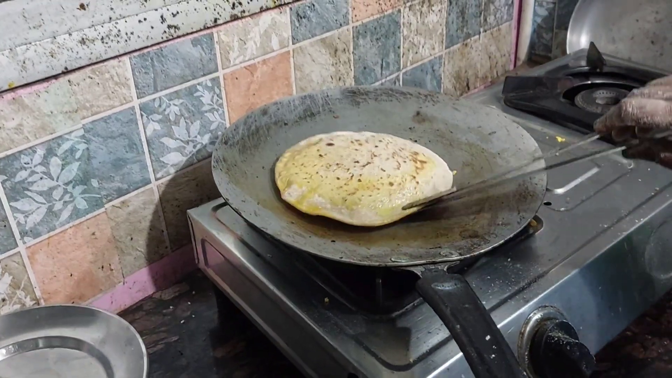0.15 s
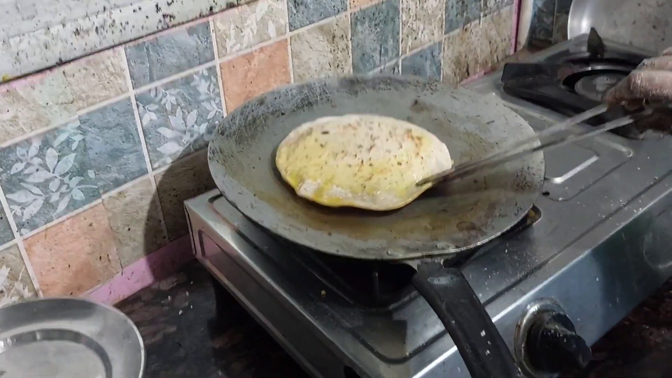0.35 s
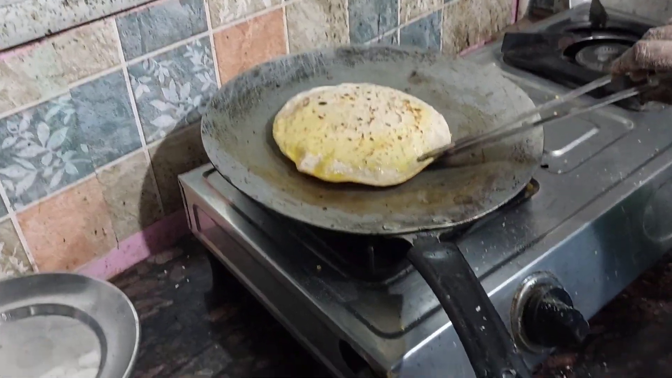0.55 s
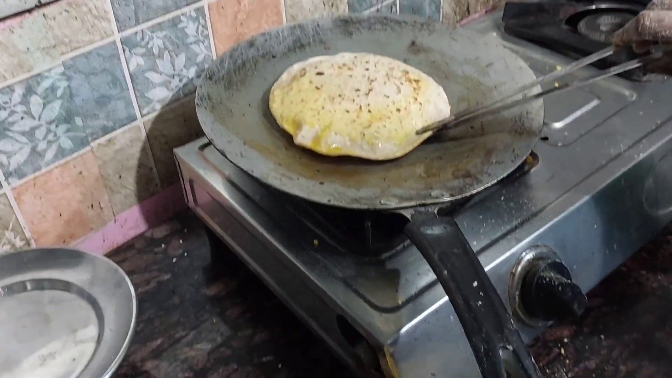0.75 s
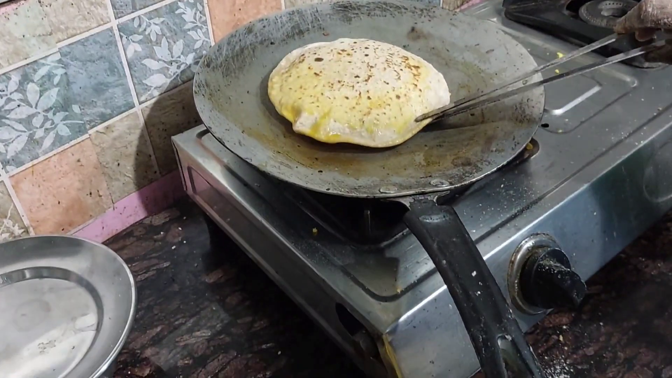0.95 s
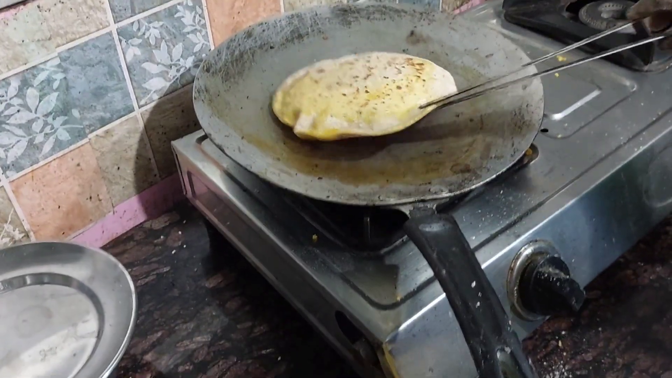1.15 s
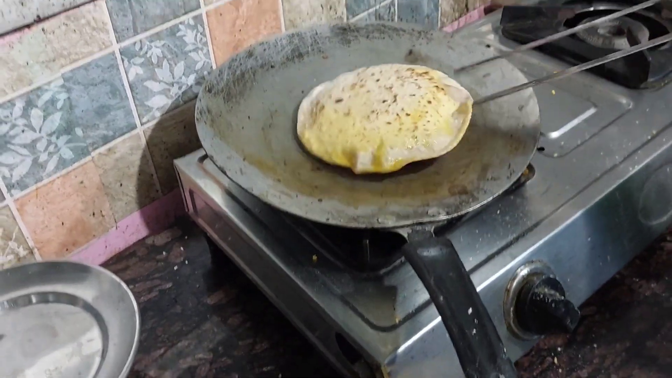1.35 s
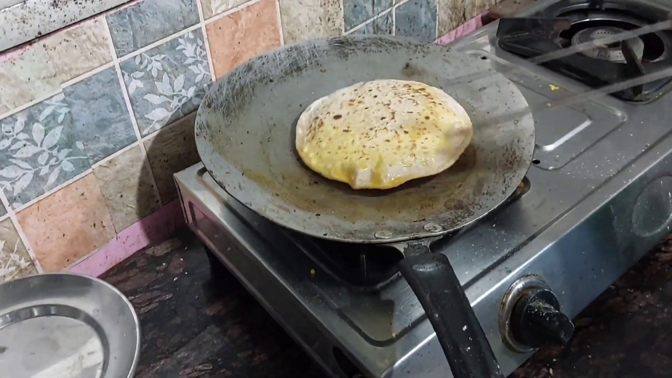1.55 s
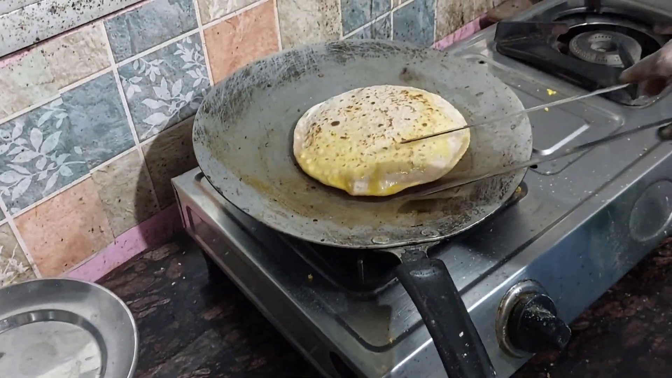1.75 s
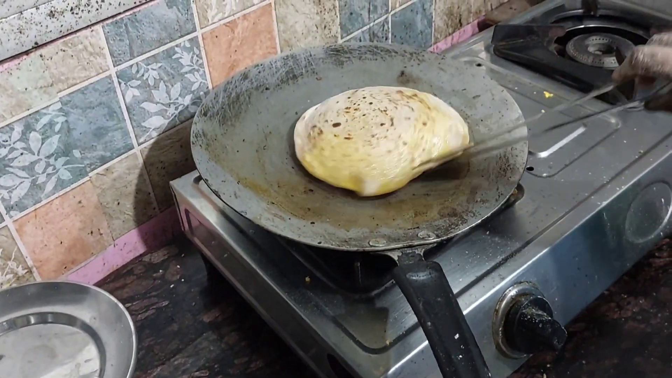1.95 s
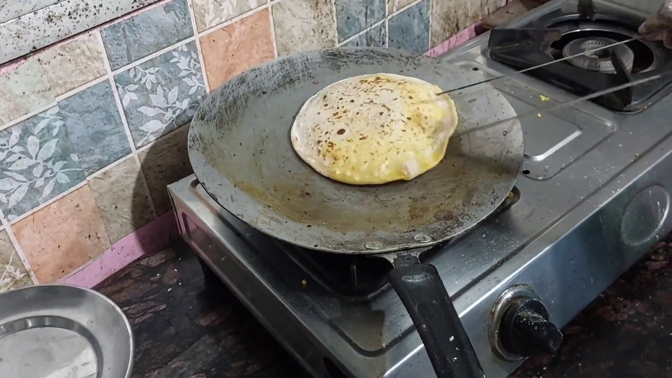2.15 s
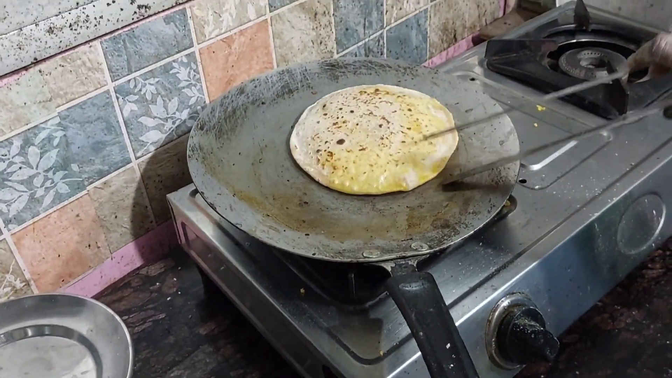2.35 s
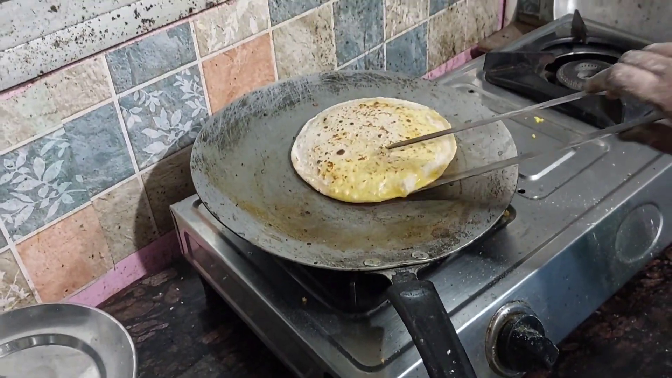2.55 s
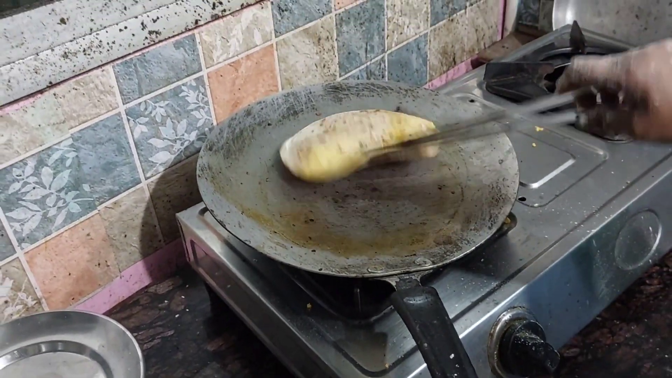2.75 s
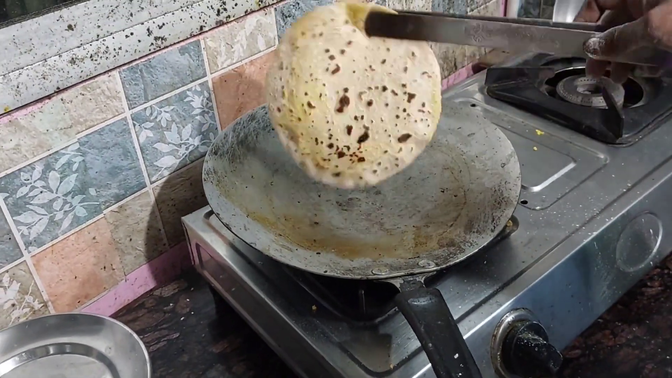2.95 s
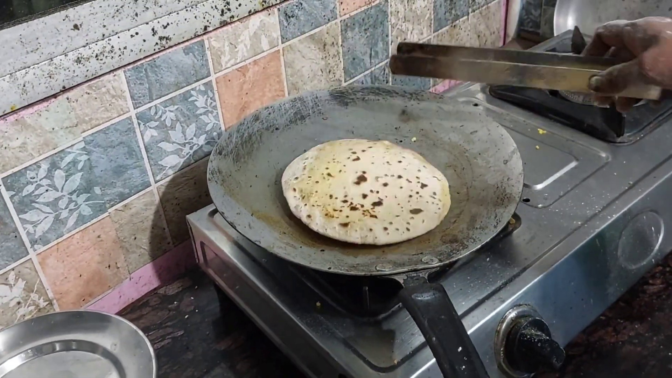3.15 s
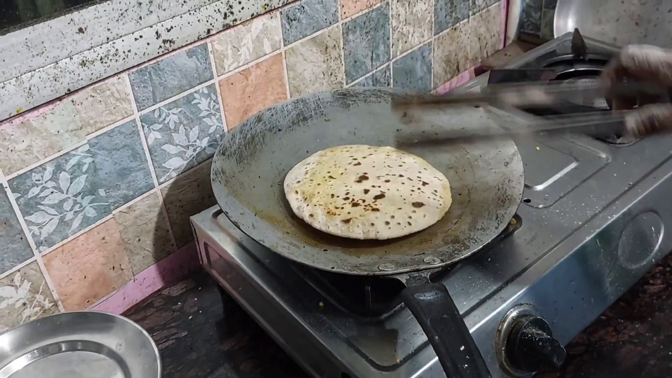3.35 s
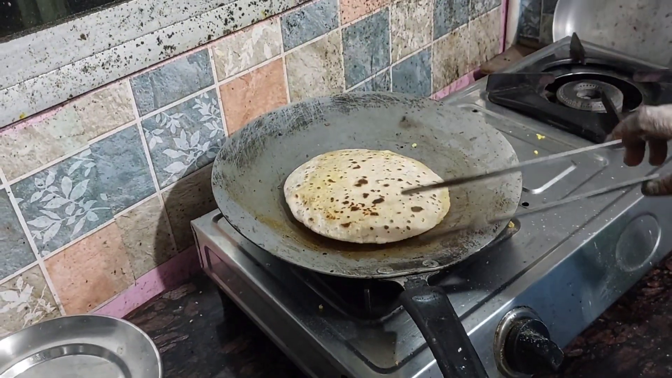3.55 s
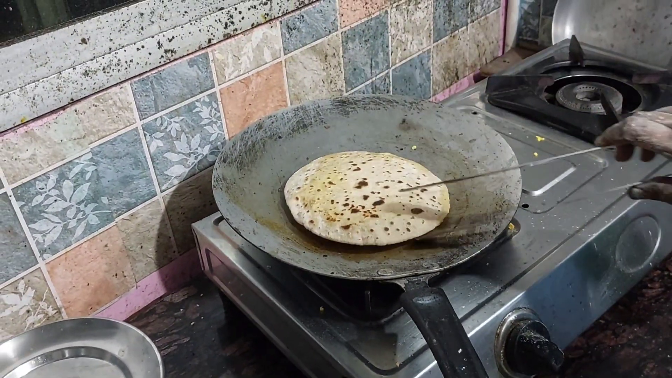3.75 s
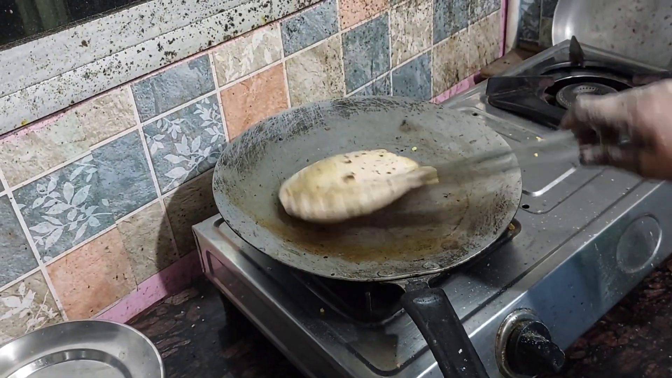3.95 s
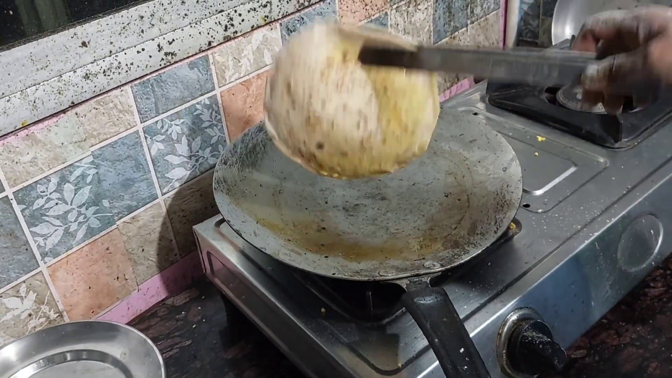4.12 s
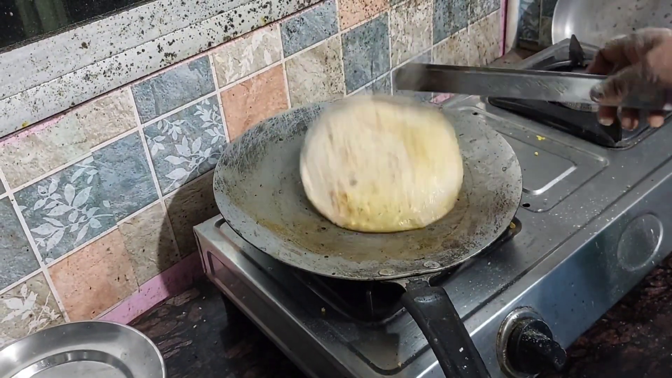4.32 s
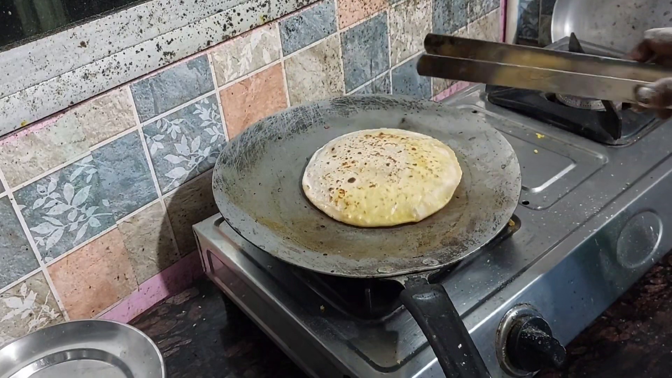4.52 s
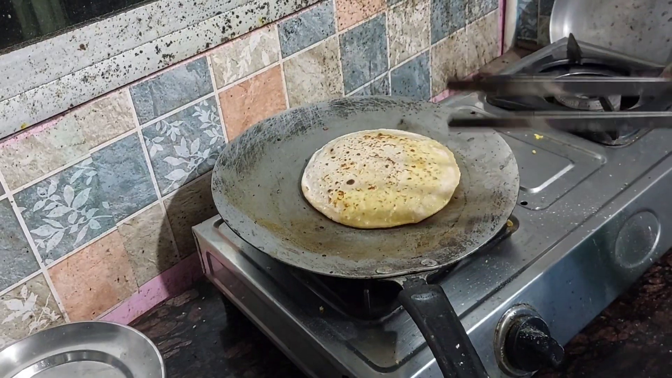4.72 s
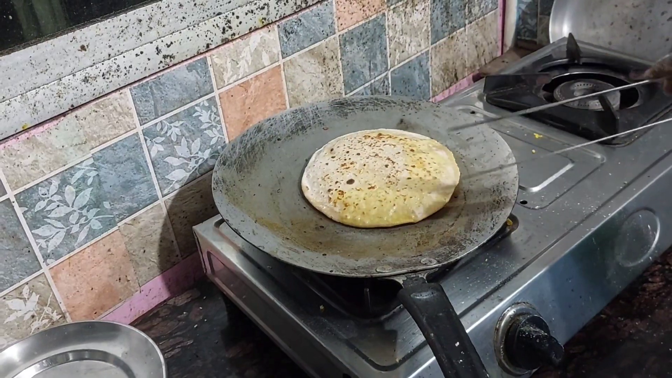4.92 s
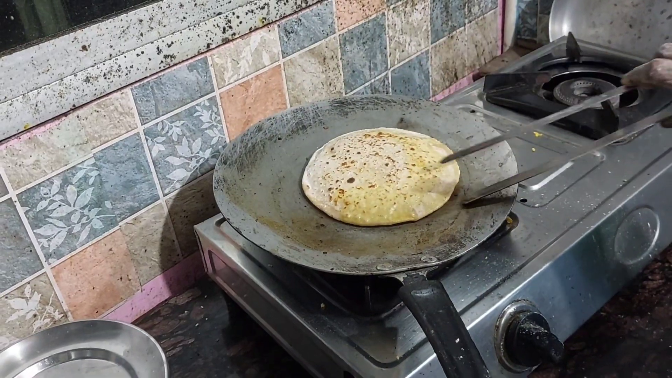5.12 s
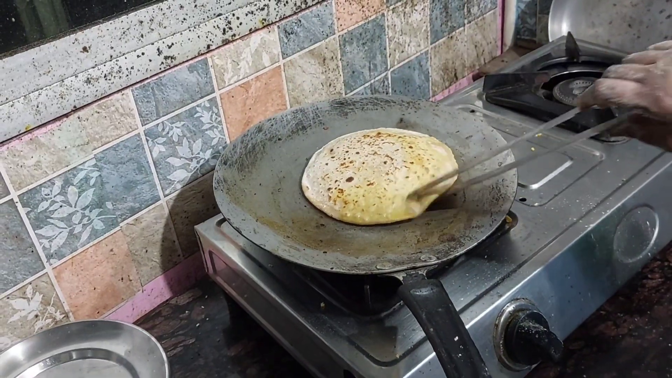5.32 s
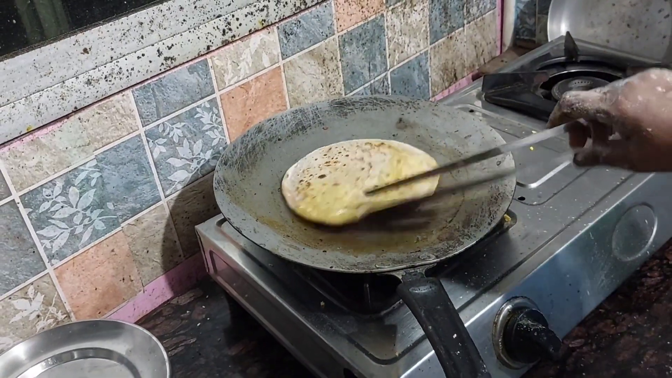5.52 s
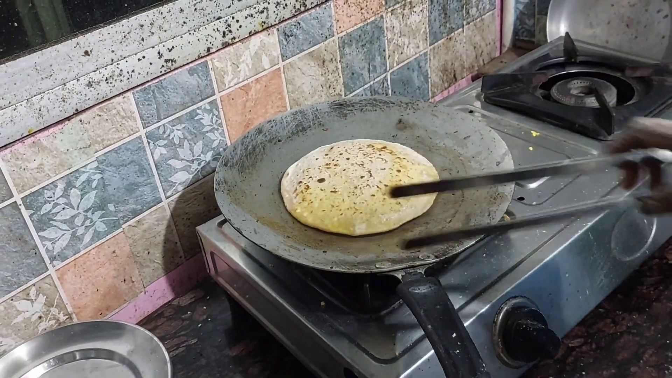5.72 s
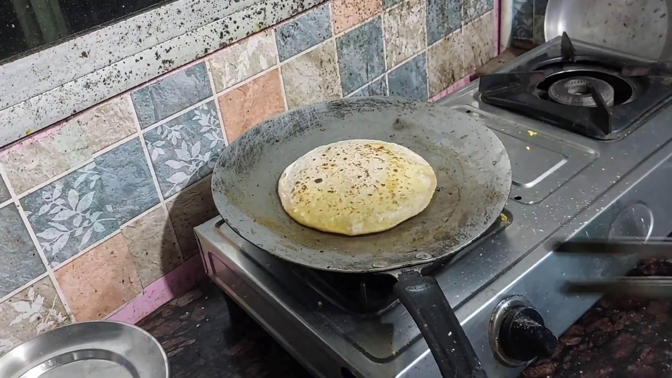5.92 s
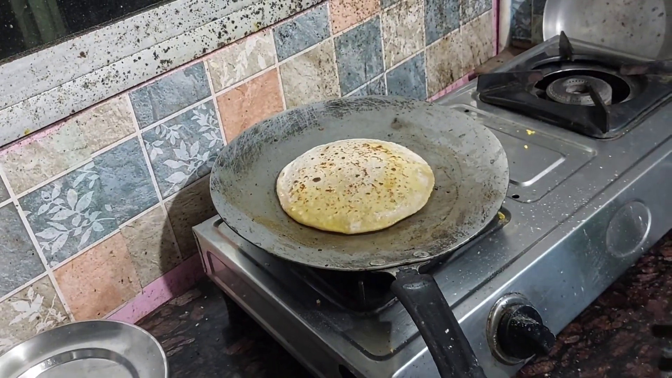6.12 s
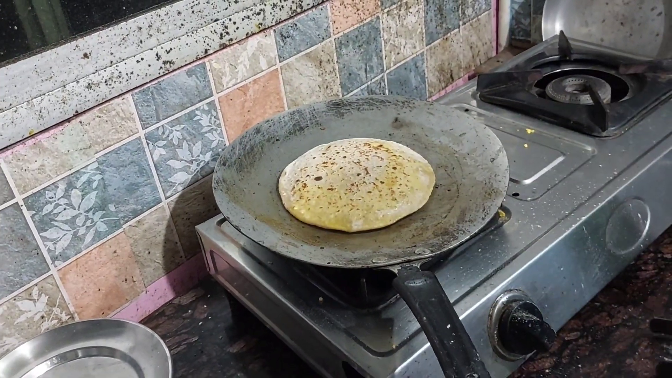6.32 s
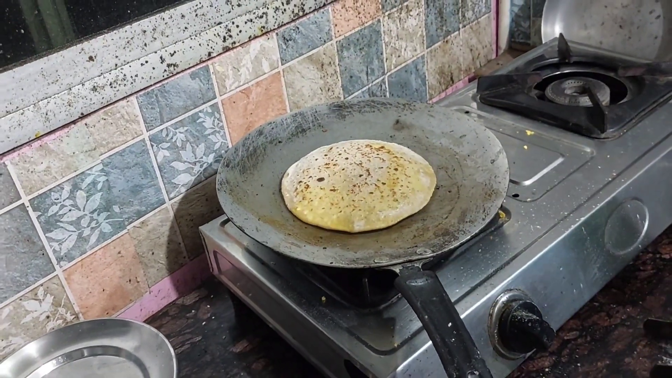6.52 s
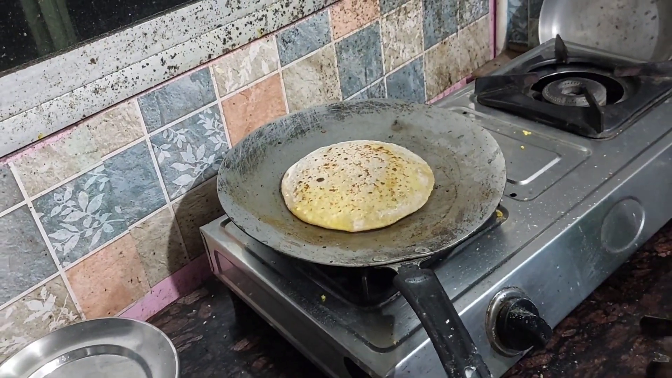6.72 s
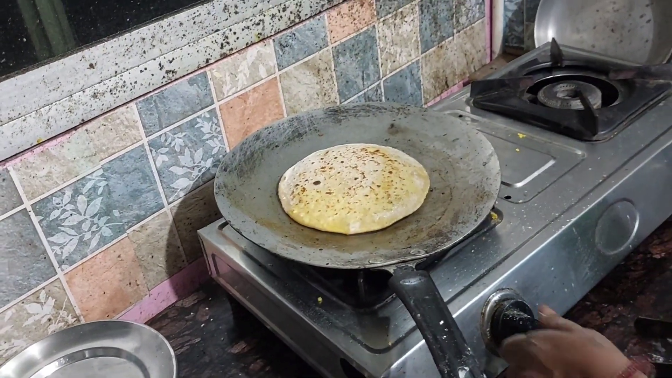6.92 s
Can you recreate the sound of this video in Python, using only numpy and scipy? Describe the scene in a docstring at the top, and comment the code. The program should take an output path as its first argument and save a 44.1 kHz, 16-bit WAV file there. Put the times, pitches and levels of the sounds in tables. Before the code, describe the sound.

A close stereo pickup of bread frying on a griddle, sources slightly to the right. Quiet flame rush and crisp fizz continue, with a very faint distant cricket. Light scrapes and steel taps lead to a heavy wet slap, more taps, then a second double-edged slap. After another tap and scrape it calms, until metal tongs clatter brightly on stone, shuffle and bump.

```python
"""In a small tiled kitchen, a puffed flatbread fries on an iron griddle over a gas flame.
Steel tongs tap, pinch and scrape: shaped noise makes the contacts, narrow resonances make the steel ring.
The bread slaps down twice, with a noisy smack and thud, and sine waves make the griddle ring and rock.
Flame and frying are shaped noise; steam whistles are gliding, unsteady tones; a far cricket is pulsing noise.
At the end the tongs are laid on the stone counter, with chinks, dull knocks, a shuffle and a bump."""
import sys
import numpy as np
from scipy import signal
from scipy.fft import rfft, irfft, next_fast_len
from scipy.io import wavfile
from scipy.ndimage import map_coordinates

SR = 44100
rng = np.random.default_rng(int(sys.argv[2]) if len(sys.argv) > 2 else 0)


def output_pcm(signal):
    """Save a mono or channel-first signal as 16-bit PCM at the path in sys.argv[1].

    Samples are clipped to [-1, 1] before scaling.
    """
    pcm = np.clip(np.atleast_2d(signal).T, -1, 1) * 32767
    wavfile.write(sys.argv[1], SR, np.round(pcm).astype(np.int16))


N = 312221
TIME = np.arange(N) / SR  # seconds
HIT = np.arange(2 * SR // 3) / SR  # seconds after a blow

# strokes of the tongs over the iron: [start_s, length_s, scrape_db, steel_squeal_db, bread_fizz_db]
STROKES = [(1.172, 0.244, -55, -60, -58), (1.95, .17, -50.5, -52.5, -50),
           (2.487, 0.27, -49.5, -53.5, -52.5), (3.782, .15, -50.5, -45, -49),
           (4.184, 0.15, -49.5, -55, -68), (5.205, 0.21, -49.5, -51.5, -60)]
# sound colour of a heavy thud on the griddle: [pitch_hz, relative_level_db_per_hz]
THUD_COLOUR = [(29, -37), (50, -19), (345, -4), (428, -4.5), (586, -8), (661, -11.5), (1070, -8),
               (1210, -1), (1400, -4), (1740, -7), (2750, -6.5), (3100, -13), (13200, -27), (16000, -50)]
# sound colour of a small hard contact: [pitch_hz, relative_level_db_per_hz]
CRISP_COLOUR = [(1500, -19), (3300, -3), (5200, -15.5), (7000, 2), (9300, -7), (12500, 6), (15500, -3.5)]
# sound colour of a light tick of steel: [pitch_hz, relative_level_db_per_hz]
TICK_COLOUR = [(530, -8), (900, -8), (1850, -5.5), (2220, -9), (2570, -2.5), (3040, -4), (11800, -9.5),
               (16000, -9)]


def amp(db):
    """Turn decibels into a gain."""
    return 10 ** (np.asarray(db) / 20)


def unit(x):
    """Scale a sound to an rms level of 1."""
    return x / np.sqrt(np.mean(x ** 2) + 1e-20)


def along(points, hz):
    """Read a curve of (Hz, value) points, spacing the pitches on a log scale."""
    point_hz, value = np.transpose(points)
    return np.interp(np.log(hz + 1), np.log(point_hz), value)


def broad(points):
    """Make a smooth sound colour: gain at each frequency."""
    return lambda hz: amp(along(points, hz))


def resonant(modes, scatter_db=0):
    """Gain of a set of resonances; each contact point excites them a little differently."""
    centre_hz, width_hz, db = np.transpose(modes)
    gain = amp(db + scatter_db * rng.standard_normal(len(db)))

    def colour(hz):
        """Each resonance is a peak; their energies add."""
        peaks = zip(centre_hz, width_hz, gain)
        return np.sqrt(sum(g ** 2 / (1 + (2 * (hz - f) / w) ** 2) for f, w, g in peaks))

    return colour


def wobble(rate):
    """A smooth random curve through this many random points a second."""
    points = rng.standard_normal(int(N * rate / SR) + 4)
    return map_coordinates(points, [TIME * rate])


def add(track, s, sound):
    """Mix a sound into the track at time s (seconds)."""
    start = round(s * SR)
    track[:, start:start + sound.shape[1]] += sound[:, :N - start]


def held(rows, attack_s, sag_db_per_s, release_s):
    """Gain of (start s, length s, dB) movements: each rises, sags while it lasts, then dies away."""
    gain = np.zeros(N)
    for s, length, db in rows:
        age = np.maximum(TIME - s, 0)
        rise = np.minimum(age / attack_s, 1)
        fall = np.exp(-np.maximum(age - length, 0) / release_s)
        gain += rise * amp(db - sag_db_per_s * age) * fall
    return gain


def diffuse(drive, colour):
    """Colour two random drives as sound from all sides: two microphones agree only on long waves."""
    size = next_fast_len(drive.shape[1])
    hz = np.fft.rfftfreq(size, 1 / SR)
    spacing_m, sound_speed = 0.14, 343  # metres between microphones, metres per second
    alike = .95 * np.sinc(2 * hz * spacing_m / sound_speed)
    spectrum = rfft(drive, size) * colour(hz) * np.sqrt([1 + alike, 1 - alike])
    mid, side = irfft(spectrum, size)[:, :drive.shape[1]]
    return unit(np.array([mid + side, mid - side]))


def blow(colour, length, rise_s, direct=0, ripple_db=3):
    """A blow of noise and its echoes off the tiles, the treble dying sooner than the bass."""
    # how long sound takes to fade by 60 dB, before scaling by length: [pitch_hz, fade_s]
    kitchen_fade = [(100, 0.85), (450, 0.52), (1000, 0.43), (2500, 0.37), (6000, 0.33), (14000, 0.29)]
    early = np.exp(-HIT / 0.06)
    uneven_db = 4.25 * early * rng.standard_normal(len(HIT)) - 1.7 * early  # first echoes come one by one
    drive = rng.standard_normal((2, len(HIT))) * amp(uneven_db)

    def rippled(hz):
        """Near walls ripple the treble."""
        ripple = map_coordinates(rng.standard_normal(SR // 100), [hz / 130])
        return colour(hz) * amp(ripple_db * ripple * np.minimum(hz / 2500, 1))

    hz, t, z = signal.stft(diffuse(drive, rippled), SR, nperseg=512)
    fade = np.exp(-np.log(1000) * t / (length * along(kitchen_fade, hz)[:, None]))
    sound = signal.istft(z * fade, SR, nperseg=512)[1][:, :len(HIT)]
    onset = 1 - np.exp(-HIT / rise_s)
    return sound * onset * (1 + direct * np.exp(-HIT / 0.0085))  # direct lifts the first milliseconds


def griddle(lowest_fade_s=0.56, damping=0.21, blur_hz=4.2):
    """The iron rings as many sines, blurred by rattling on the stand; high ones die sooner."""
    # ringing pitches of the griddle on its stand: [pitch_hz, energy_db]
    iron_modes = [(301.5, -42), (393.0, -42.5), (436.0, -35), (509, -34), (665, -41), (912, -43.5),
                  (1183, -40.5), (1244, -39), (1470, -69), (1728, -36.5), (1825, -65), (2083, -69),
                  (2132, -47.5), (2304, -51), (2363, -42.5), (2536, -43.5), (2767, -41.5), (2853, -47.5)]
    hz, db = np.transpose(iron_modes)[:, :, None]
    fade_s = lowest_fade_s * (hz / hz.min()) ** -damping  # time to fade by 60 dB
    gain = amp(db) / np.sqrt(fade_s)
    phase = rng.uniform(0, 2 * np.pi, hz.shape)
    # high pitches differ more between the microphones
    phase = phase + rng.standard_normal((2, *hz.shape)) * np.minimum(hz / 800, 1.1)
    rattle = np.cumsum(rng.standard_normal((len(hz), len(HIT))), axis=1) * np.sqrt(2 * np.pi * blur_hz / SR)
    fading = gain * np.exp(-np.log(1000) * HIT / fade_s)
    modes = np.sin(2 * np.pi * hz * HIT + phase + rattle) * fading
    return modes.sum(1) / np.linalg.norm(gain) * (1 - np.exp(-HIT / 0.0041))


def cricket(pitch_hz=6850, width_hz=230):
    """A faint, far cricket: a narrow band of noise pulses nine times a second, smeared by the room."""
    pulse = (.5 + .5 * np.cos(2 * np.pi * 9.07 * (TIME + .008))) ** 2
    note = diffuse(rng.standard_normal((2, N)), lambda hz: 1 / (1 + ((hz - pitch_hz) / width_hz) ** 4))
    return amp(-60.5) * (0.44 + 0.47 * pulse) * note


def pressure(levels_db):
    """How hard the tongs bear down in each stroke: they lean in, hold and let go."""
    rows = [(row[0], row[1], db) for row, db in zip(STROKES, levels_db)]
    return held(rows, attack_s=0.025, sag_db_per_s=-2, release_s=0.042)  # negative sag: slowly louder


def frying():
    """Strength of the frying: steady heat, checked by each landing, with more fizz where the tongs press."""
    # moments when a cooler side of the bread meets the iron: [time_s]
    landings = [3.22, 4.45]
    steady_db, drop_db, reheat_s = -54.5, 1.5, 0.96  # reheat_s: time constant of the recovery
    cooling = sum((TIME > s) * np.exp(-np.maximum(TIME - s, 0) / reheat_s) for s in landings)
    *_, fizz_db = np.transpose(STROKES)
    return np.hypot(amp(steady_db - drop_db * cooling), pressure(fizz_db))


def stove():
    """The flame is a rush of low noise; under the bread a film of oil fizzes in tiny random bursts."""
    # sound colour of the gas flame: [pitch_hz, relative_level_db_per_hz]
    flame_colour = [(15, -29), (25, 3), (69, -3), (93, -5.5), (275, -4.5), (300, -1.5), (326, -10.5),
                    (449, -4), (478, -9), (631, -9), (814, -12.5), (1140, -10), (1350, -13.5),
                    (2510, -14.5), (4000, -26), (5200, -30.5), (8800, -120)]
    # sound colour of the frying oil: [pitch_hz, relative_level_db_per_hz]
    sizzle_colour = [(2500, -25), (3500, -4), (5800, -3), (7400, -1.5), (8300, 2), (9400, -5), (10700, 1),
                     (12500, -0.5), (15000, -7)]
    rush = diffuse(rng.standard_normal((2, N)), broad(flame_colour))
    flame = amp(-48.0 + 0.5 * wobble(14)) * rush
    bursts = rng.standard_normal((2, N)) * (rng.random(N) < 900 / SR)  # about 900 a second
    hiss = rng.standard_normal((2, N))
    fizz = diffuse(0.32 * unit(bursts) + hiss, broad(sizzle_colour))
    return flame + frying() * fizz


def steam(bend=0.66):
    """Thin, unsteady whistles glide with the pressure in the bread, quickly at first and then more slowly."""
    # steam leaves a pinhole in the crust: [start_s, length_s, first_pitch_hz, last_pitch_hz, level_db]
    whistles = [(.15, 0.44, 14400, 12700, -60), (.55, 0.51, 9700, 15450, -51.5)]
    out = np.zeros((2, N))
    for s, length, first_hz, last_hz, db in whistles:
        progress = np.clip((TIME - s) / length, 0, 1) ** bend
        pitch_hz = first_hz + (last_hz - first_hz) * progress
        phase = 2 * np.pi * np.cumsum(pitch_hz) / SR
        tone = [wobble(330) * np.sin(phase) + wobble(330) * np.cos(phase) for channel in range(2)]
        strength = held([(s, length, db)], attack_s=0.089, sag_db_per_s=7, release_s=0.015)
        out += strength * unit(np.array(tone))
    return out


def counter():
    """The loose blades chink on the stone, which knocks dully; a low shuffle and a small bump follow."""
    # the tongs are laid down and settle: [time_s, steel_ring_db, counter_knock_db]
    set_down = [(6.2775, -22, -31), (6.446, -37, -42), (6.471, -34.5, -37.5), (6.501, -32.5, -34.5),
                (6.529, -49, -39.5), (6.565, -60, -40)]
    # resonances of the free tong blades: [pitch_hz, width_hz, level_db]
    blade_modes = [(7260, 33, -0.5), (8200, 39, -3.5), (8790, 32, -18), (9450, 72, -10), (9700, 34, -9),
                   (10320, 48, -9), (11650, 26, 0), (12600, 31, -10), (12970, 34, 4), (13900, 44, -5),
                   (14500, 40, -6)]
    # resonances of the stone under the steel: [pitch_hz, width_hz, level_db]
    stone_modes = [(233, 44, -9.5), (440, 43, 0), (916, 76, -1.5), (1340, 400, -13.5), (1640, 180, -13),
                   (2480, 420, -16), (2980, 360, -23)]
    # resonances of a small hollow knock: [pitch_hz, width_hz, level_db]
    bump_modes = [(536, 39, 3), (650, 41, 2), (888, 27, 4.5), (2480, 200, -16)]
    # dull shuffles along the counter: [start_s, length_s, level_db]
    shuffle_moves = [(6.47, 0.352, -41.5), (6.92, 0.18, -50.5)]
    # sound colour of the shuffle: [pitch_hz, relative_level_db_per_hz]
    dull_colour = [(71, -39), (120, -14), (314, 7), (360, -16), (400, 7), (1200, -36), (1560, -58),
                   (2640, -120)]
    out = np.zeros((2, N))
    for s, ring_db, knock_db in set_down:
        ring = amp(2.5) * blow(resonant(blade_modes, scatter_db=2.0), length=0.57, rise_s=0.0009, ripple_db=1.0)
        crack = amp(-2.5) * blow(broad(CRISP_COLOUR), length=0.98, rise_s=0.00045, direct=0.47)
        add(out, s, amp(ring_db) * amp([[-2.5], [1.5]]) * (ring + crack))  # louder on the right
        add(out, s, amp(knock_db) * blow(resonant(stone_modes), length=0.71, rise_s=0.001))
    add(out, 6.897, amp(-38.0) * blow(resonant(bump_modes), length=0.52, rise_s=0.0016))
    strength = held(shuffle_moves, attack_s=0.027, sag_db_per_s=11, release_s=0.02)
    rub = diffuse(rng.standard_normal((2, N)), broad(dull_colour))
    return out + strength * amp(1.7 * wobble(30)) * rub


def scrapes(width_hz=62, uneven_db=1.5):
    """The tips catch on many tiny burnt specks, each a small kick into the steel and iron."""
    # sound colour of the rough scrape: [pitch_hz, relative_level_db_per_hz]
    rasp_colour = [(150, -14), (250, -6), (308, 6.5), (367, -14), (493, 7.5), (607, -18), (1550, -6.5),
                   (1850, -25), (2240, -9), (11900, -19.5), (16000, -20)]
    # resonances of the tongs held against the iron: [pitch_hz, level_db]
    pressed_modes = [(1270, -70), (1852, -55), (2471, -60), (3295, -67.5), (4355, -68), (5028, -79),
                     (8366, -87), (8759, -108)]
    _, _, scrape_db, squeal_db, _ = np.transpose(STROKES)
    catches = rng.standard_normal((2, N)) * (rng.random(N) < 900 / SR)  # about 900 a second
    grit = unit(catches) + 1.86 * rng.standard_normal((2, N))
    singing = resonant([(hz, width_hz, db) for hz, db in pressed_modes])
    scrape = pressure(scrape_db) * diffuse(grit, broad(rasp_colour))
    squeal = pressure(squeal_db) * diffuse(grit, singing)
    return amp(uneven_db * wobble(49)) * (scrape + squeal)


def taps():
    """A tip ticks on the iron and both tongs and griddle answer; pinching jaws snap and chatter."""
    # tips touch the iron: [time_s, level_db, griddle_knock_re_level_db, brightness_db]
    touches = [(1.929, -36, -4, -8), (2.463, -35.5, -10.5, -8), (3.444, -43, 1, -5),
               (3.733, -29.5, -7.5, 5.5), (3.821, -40.5, -4, -7), (4.136, -36.5, 0.5, 1),
               (4.216, -41, 3.5, -4), (5.157, -30.5, -12.5, 1)]
    # resonances of the tongs against iron: [pitch_hz, width_hz, level_db]
    tip_modes = [(1900, 43, 5.5), (2550, 59, 4), (3250, 84, -4.5), (4256, 32, 2.5), (5430, 85, -21),
                 (6970, 32, -12.5), (7800, 100, -4), (9820, 30, -58), (11000, 26, 2), (11930, 63, -1),
                 (12600, 110, -15), (12600, 47, 1), (14000, 130, -19), (15100, 34, -26)]
    # the jaws snap together and chatter: [time_s, level_db]
    pinches = [(2.129, -26.5), (2.14, -30), (2.157, -33.5)]
    # resonances of the jaws: [pitch_hz, width_hz, level_db]
    jaw_modes = [(1760, 44, 3), (2580, 40, 0.5), (2830, 34, -3), (3390, 14, -1.5), (4200, 34, -24),
                 (5740, 37, -22), (8130, 33, -11), (10300, 55, -12), (12000, 140, -10.5), (14700, 53, -31)]
    out = np.zeros((2, N))
    for s, db, knock_db, bright_db in touches:
        hardness = broad([(3000, 0), (12000, bright_db)])  # a harder touch has more treble
        tips, light = resonant(tip_modes, scatter_db=1), broad(TICK_COLOUR)
        steel = amp(-2.0) * blow(lambda hz: tips(hz) * hardness(hz), length=0.63, rise_s=0.0024)
        tick = amp(-1) * blow(lambda hz: light(hz) * hardness(hz), length=0.65, rise_s=0.0009, direct=0.18)
        iron = amp(3.5) * griddle() + blow(broad(THUD_COLOUR), length=1.0, rise_s=0.011)
        add(out, s, amp(db) * (steel + tick + amp(knock_db) * iron))
    for s, db in pinches:
        snap = blow(resonant(jaw_modes), length=0.55, rise_s=0.0007, ripple_db=1.5)
        tick = amp(-5) * blow(broad(TICK_COLOUR), length=0.88, rise_s=.001, direct=0.25)
        add(out, s, amp(db) * (snap + tick))
    return out


def bread():
    """The oily crust smacks the iron, then its weight thuds and sets the griddle ringing and rocking."""
    # the bread lands, edge first and then flat: [time_s, wet_smack_db, thud_db, thud_rise_s]
    slaps = [(3.194, -18.5, -16, 0.0023), (3.221, -48, -12.5, 0.0039), (4.400, -41, -28.5, 0.0041),
             (4.409, -33, -35, 0.01), (4.420, -21.5, -19, 0.0037), (4.448, -25, -16, 0.0027)]
    # sound colour of the wet smack: [pitch_hz, relative_level_db_per_hz]
    smack_colour = [(410, -6.5), (700, -1), (1710, -8), (1970, -8), (2430, -11), (3940, -4.5), (5690, -7),
                    (11200, -7), (14800, -5.5), (16000, -29)]
    # dry flakes of crust crackle: [time_s, level_db]
    flakes = [(0.524, -47), (1.546, -53), (2.665, -45), (2.737, -43.5), (2.766, -45), (3.17, -51),
              (4.1, -45), (6.107, -49), (6.151, -50)]
    # the griddle rocks on the sheet-steel stove top: [start_s, length_s, level_db]
    rocking = [(3.19, 0.29, -41.5), (4.17, 0.17, -48), (4.425, .16, -36)]
    out = np.zeros((2, N))
    for s, smack_db, thud_db, rise_s in slaps:
        smack = blow(broad(smack_colour), length=0.58, rise_s=rise_s / 2, direct=0.51)  # quicker than the thud
        thud = amp(-4.5) * blow(broad(THUD_COLOUR), length=1.0, rise_s=rise_s)
        ring = amp([[-3.5], [-6]]) * griddle()
        add(out, s, amp(smack_db) * amp([[-.5], [.5]]) * smack)
        add(out, s, amp(thud_db) * (thud + ring))
    for s, db in flakes:
        add(out, s, amp(db) * blow(broad(CRISP_COLOUR), length=.8, rise_s=0.0016))
    # the stove top flexes under the heavy iron, at about 87 Hz
    sway = np.sin(2 * np.pi * np.cumsum(87 + 1.06 * wobble(15)) / SR)
    return out + sway * held(rocking, attack_s=0.022, sag_db_per_s=5, release_s=0.065)


def scene():
    """Mix all the sources; the stove, bread and tongs stand a little to the right."""
    far = cricket()
    heat = (stove() + steam()) * amp([[-.5], [.6]])  # left and right trims in dB
    tongs = (taps() + scrapes()) * amp([[-.3], [1.5]])
    landing = bread() * amp([[-.5], [.7]])
    return far + heat + counter() + tongs + landing


def record(dry, low_hz=43, top_hz=15600):
    """Weaken the deepest bass and keep nothing from the top frequency upward."""
    size = next_fast_len(N + SR // 2)
    hz = np.fft.rfftfreq(size, 1 / SR)
    bass = (hz / low_hz) ** 4 / np.sqrt(1 + (hz / low_hz) ** 8)
    return irfft(rfft(dry, size) * bass * (hz < top_hz), size)[:, :N]


dry = scene()
out = record(dry)
output_pcm(out)
```